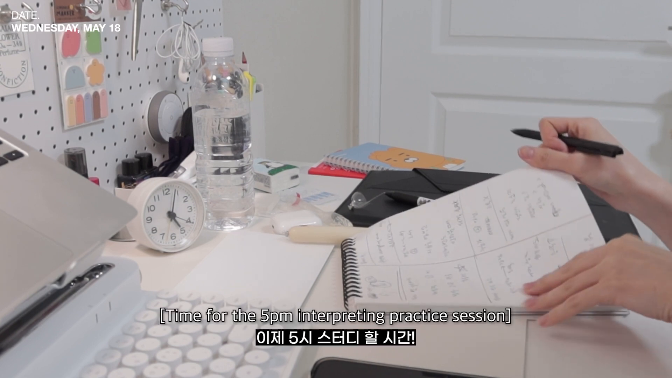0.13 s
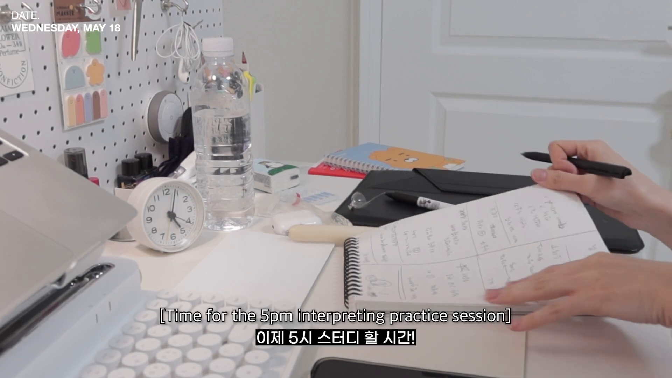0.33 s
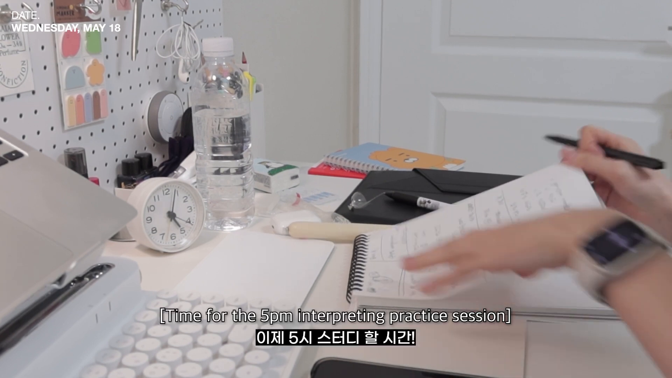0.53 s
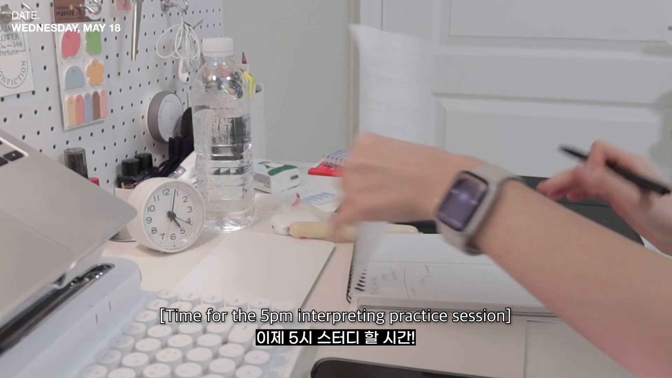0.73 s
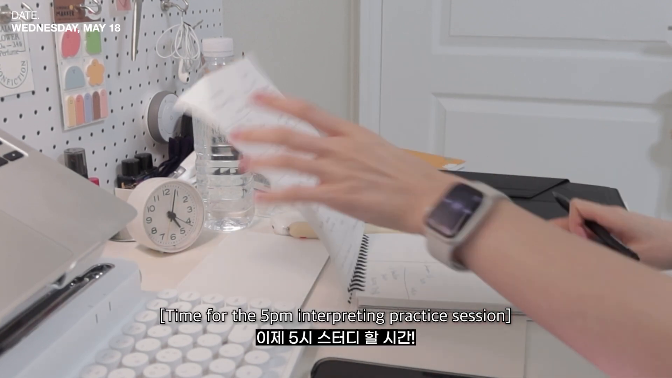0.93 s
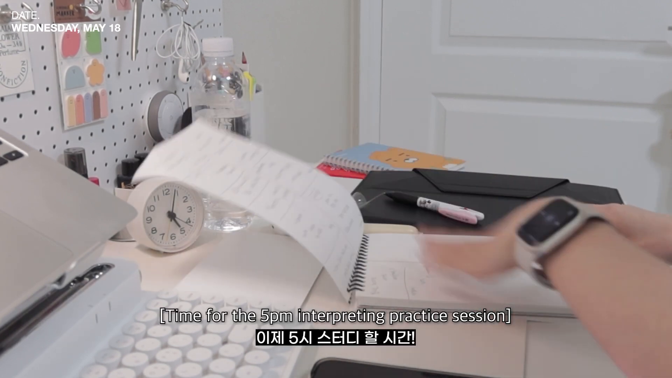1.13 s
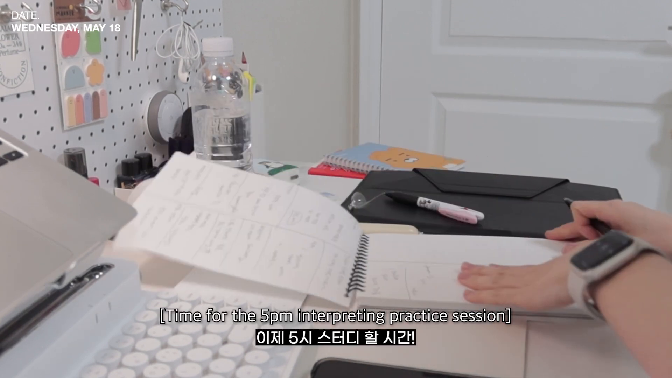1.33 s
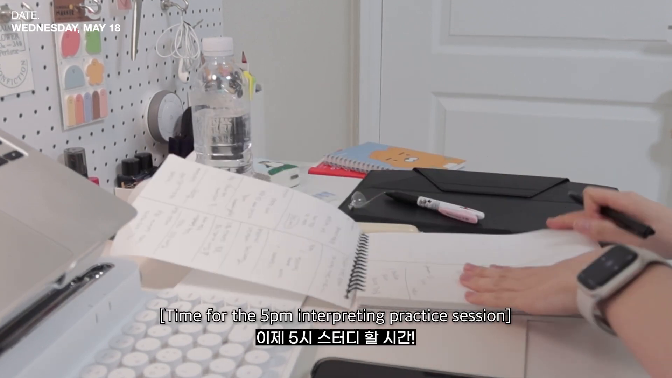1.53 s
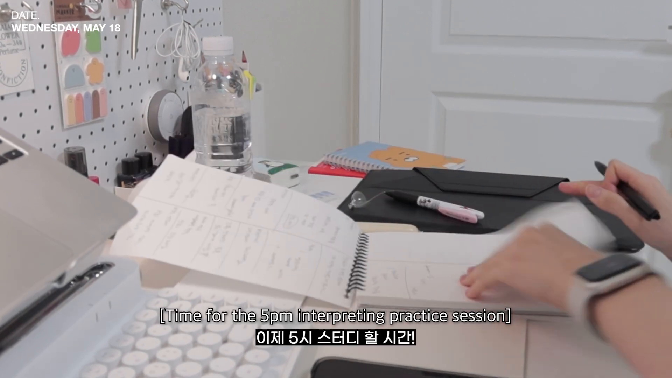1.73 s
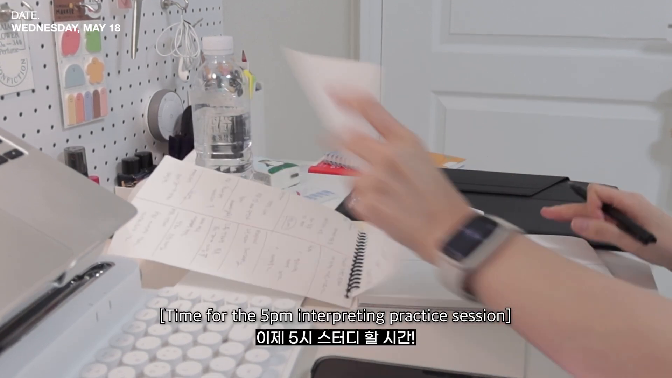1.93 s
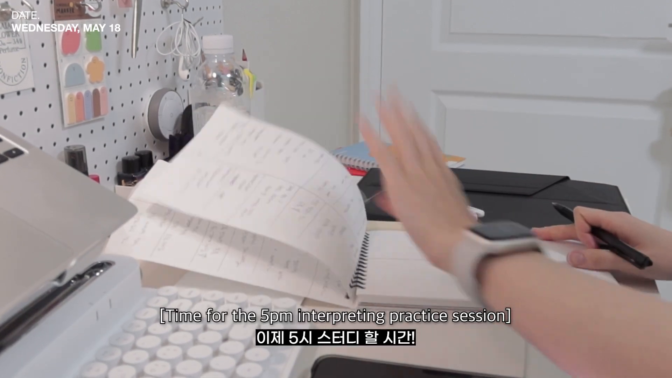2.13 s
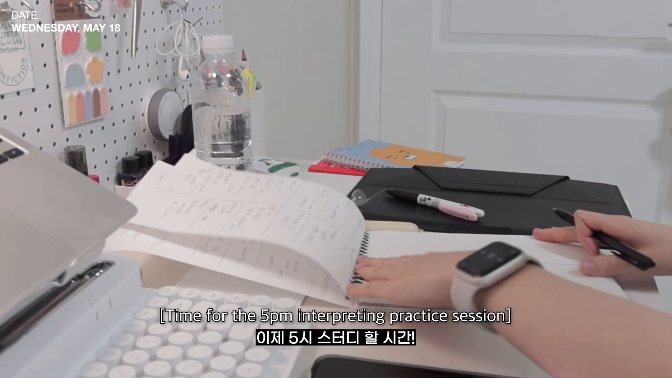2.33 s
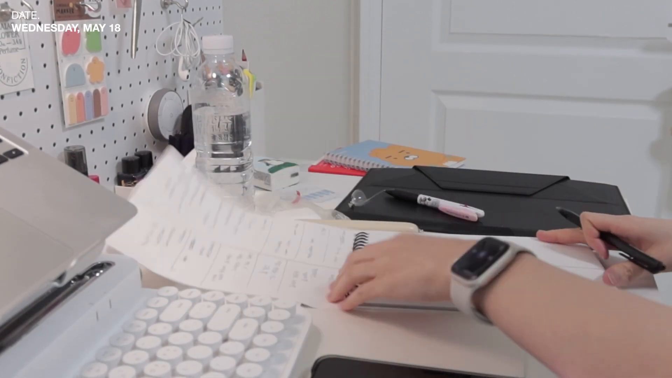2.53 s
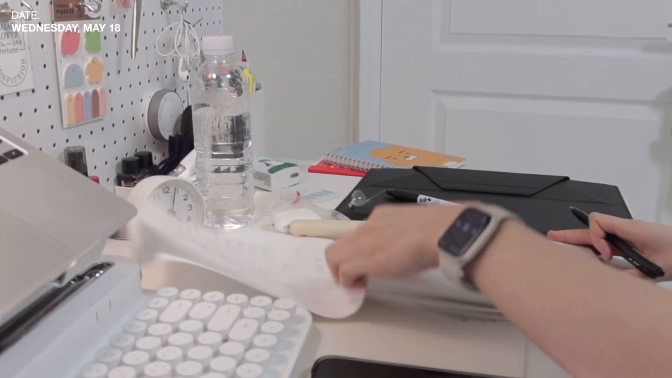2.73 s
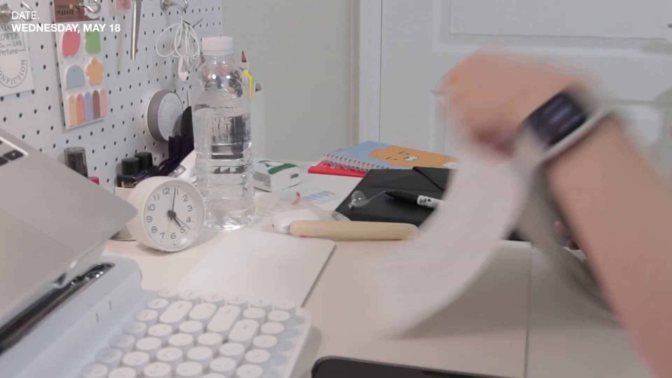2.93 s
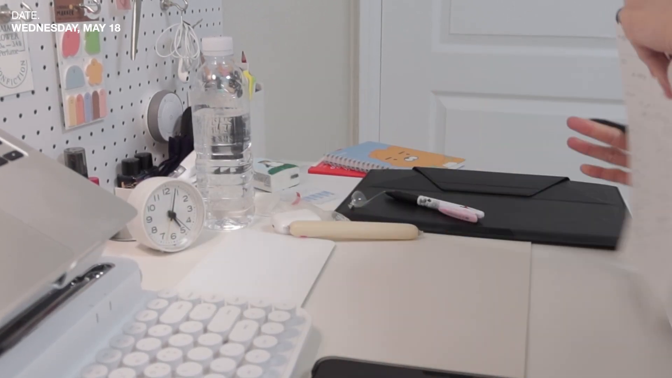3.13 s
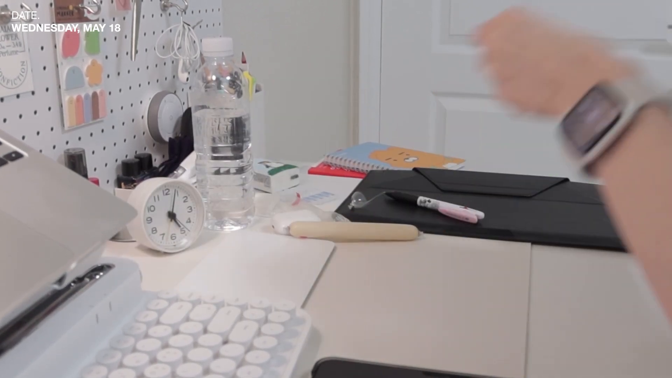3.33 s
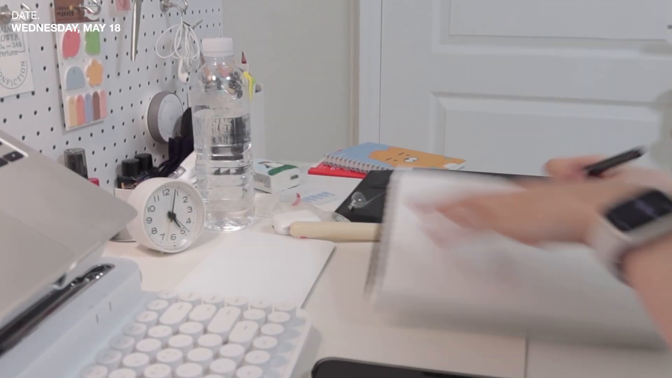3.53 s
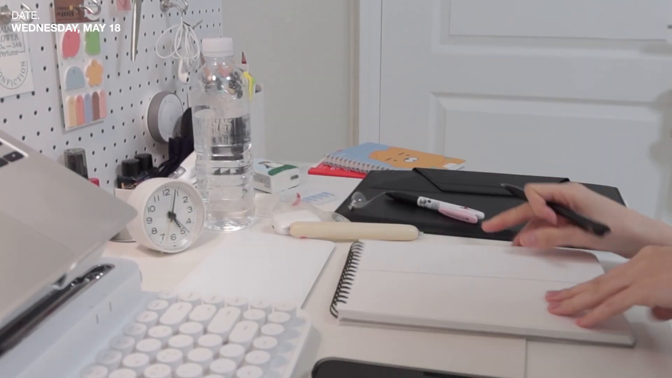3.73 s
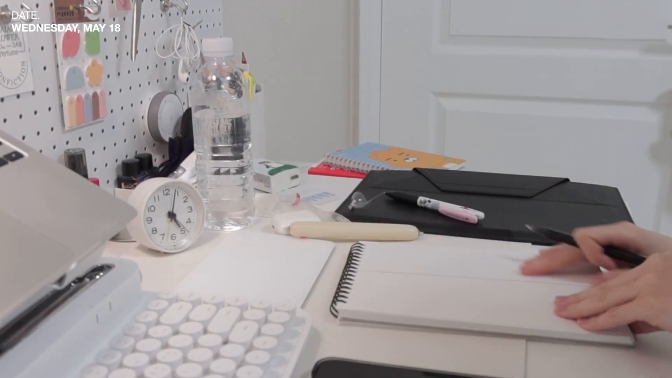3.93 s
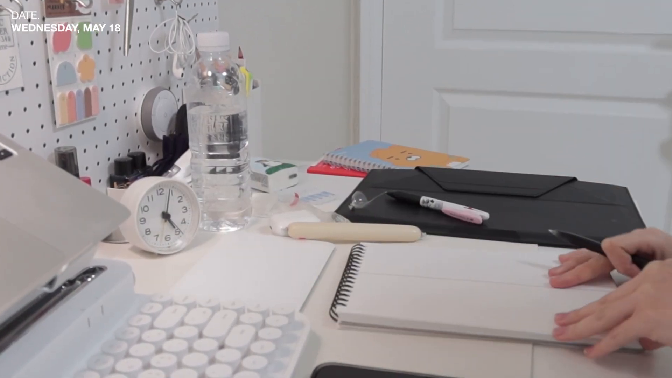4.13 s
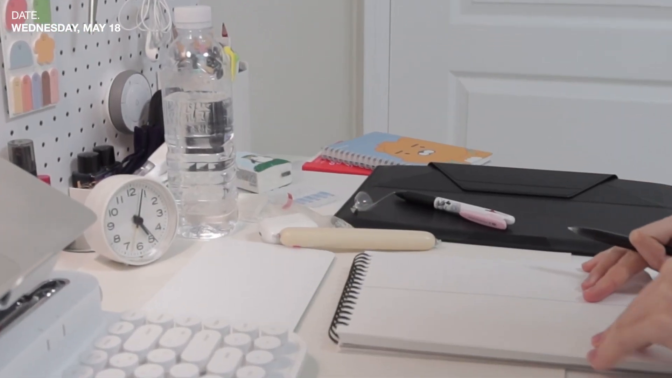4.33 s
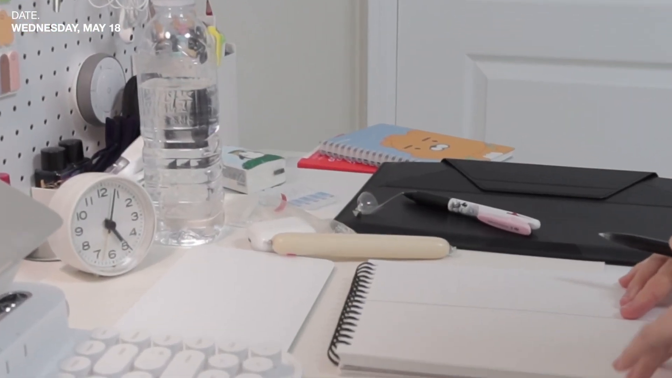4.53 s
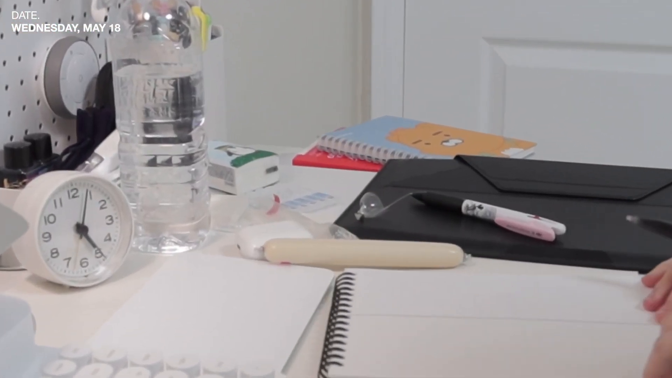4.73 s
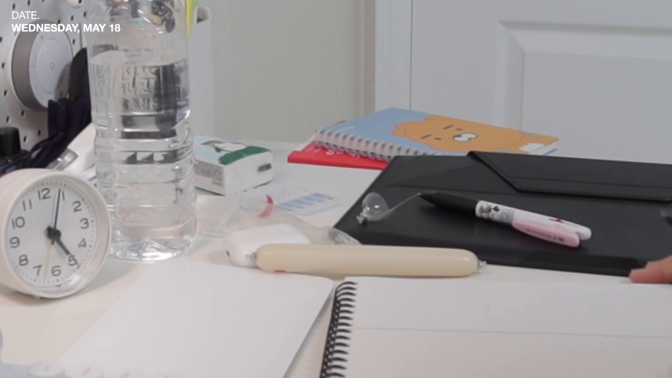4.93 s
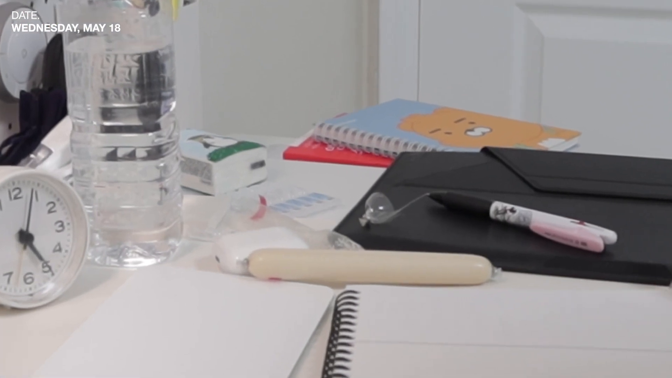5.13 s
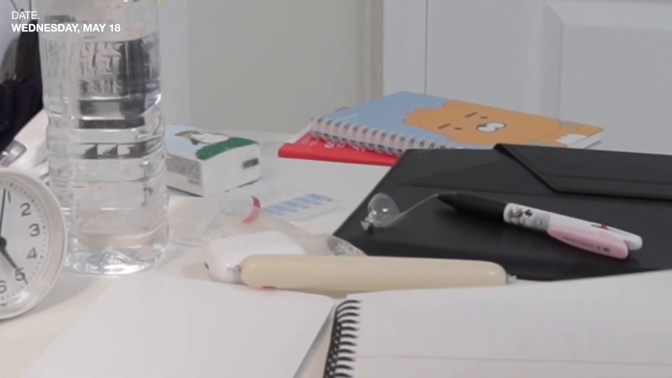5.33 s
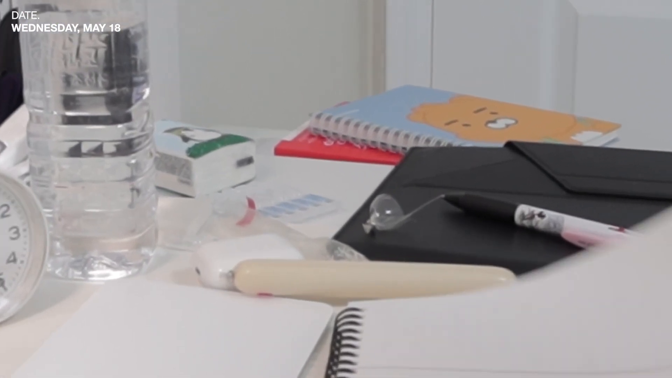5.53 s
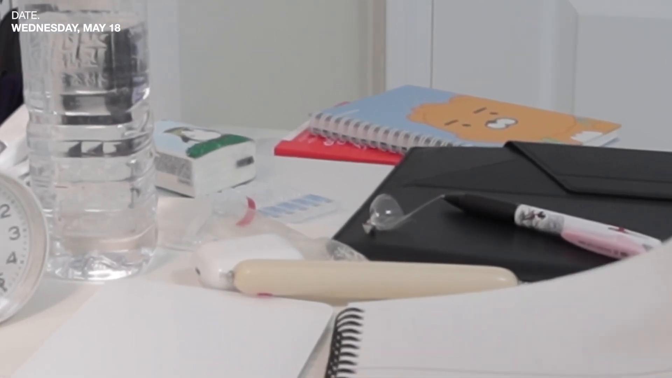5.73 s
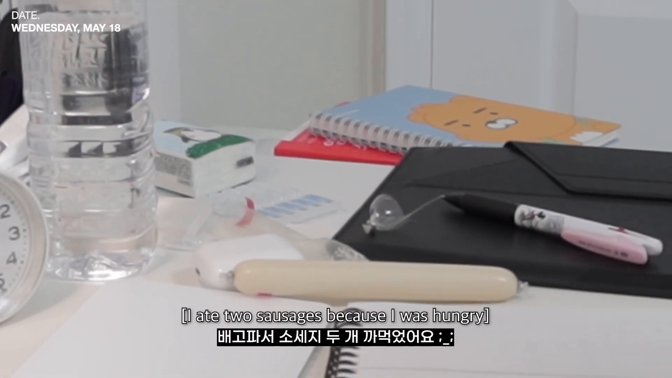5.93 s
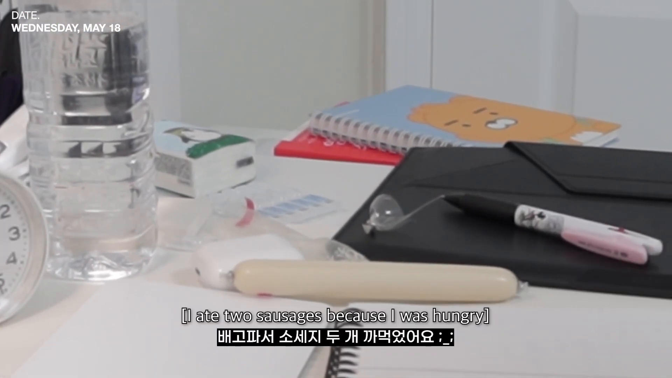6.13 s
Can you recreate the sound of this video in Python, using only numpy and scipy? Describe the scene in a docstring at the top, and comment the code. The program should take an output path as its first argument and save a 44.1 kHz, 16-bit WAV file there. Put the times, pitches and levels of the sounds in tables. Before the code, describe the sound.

Close to a small microphone in a small quiet room, hands slide over paper and turn notebook pages with rustles, flaps and dry snaps. One snap is loud enough to distort. More crackly turning follows, then the book drops on the desk with a dull knock. Afterwards there are only small brushes, ticks and faint hum.

```python
"""A faint mains hum and even room noise lie under hands and sheets that already slide at the start.
Pages of a spiral notebook are turned at a desk, close to a small microphone: patchy noise hisses, rustles and flaps.
The paper buckles with dry snaps, each a short noise burst; the loudest snap overloads the input.
Book and hands thud on the desk top as damped modes ring, and the book is dropped once.
Walls answer with decaying noise tails."""
import sys
import numpy as np
from scipy import signal
from scipy.fft import rfft, irfft, next_fast_len
from scipy.io import wavfile
from scipy.ndimage import uniform_filter1d, map_coordinates

SR = 44100
rng = np.random.default_rng(int(sys.argv[2]) if len(sys.argv) > 2 else 0)


def wrap_up_sound(samples):
    """Save the sound to the file named by the first command line argument, as 16-bit audio."""
    columns = np.atleast_2d(samples).T
    # keep every value between -1 and 1, then stretch to whole-number steps
    tamed = np.clip(columns, -1, 1)
    steps = np.round(tamed * 32767).astype(np.int16)
    wavfile.write(sys.argv[1], SR, steps)


N = 277429  # length [samples]


def amp(db):
    """Gain of a level in dB."""
    return 10 ** (np.asarray(db) / 20)


def unit(x):
    """Scaled to rms 1."""
    return x / np.sqrt(np.mean(x ** 2) + 1e-20)


def along(points, hz):
    """Curve through (Hz, value) points on a log frequency axis."""
    f, value = np.transpose(points)
    return np.interp(np.log(hz + 1), np.log(f + 1), value)


def wobble(rate):
    """A smooth random curve, rate knots a second."""
    knots = rng.standard_normal(int(N * rate / SR) + 4)
    return map_coordinates(knots, [np.arange(N) * rate / SR])


def filtered(x, response):
    """x times a response of frequency, padded so that its tail does not wrap round."""
    size = next_fast_len(len(x) + 8192)
    hz = np.fft.rfftfreq(size, 1 / SR)
    return irfft(rfft(x, size) * response(hz), size)[:len(x)]


def rush(spectrum, patchy_db, grain=1):
    """Noise of rms 1, patchy in time and pitch, multiplied by a grain and coloured by a spectrum."""
    noise = signal.stft(rng.standard_normal(N), nperseg=256)[2]
    patches = uniform_filter1d(rng.standard_normal(noise.shape), 6, 0)  # across frequency
    patches = uniform_filter1d(patches, 8, 1)  # across time
    patchy = signal.istft(noise * amp(patchy_db * unit(patches)), nperseg=256)[1][:N]
    return unit(filtered(patchy * grain, lambda hz: amp(along(spectrum, hz))))


# colour of the room noise: (frequency [Hz], relative level [dB per Hz])
AIR_SPECTRUM = [(15, -39), (32, -1.5), (50, 1), (90, 2), (200, -1.5), (420, -5), (520, -1.5), (610, -17),
                (730, -1), (900, -19), (2500, -21), (6000, -28.5), (8000, -21.5), (9500, -23),
                (15700, -23.5)]
HUM_HZ = 119.8


def background():
    """Even room noise and a hum at twice the mains frequency that wavers in phase and level."""
    phase = 2 * np.pi * HUM_HZ * np.arange(N) / SR + 0.57 * wobble(7)
    hum = amp(2.5 * wobble(9)) * np.sin(phase)
    air = amp(0.4 * wobble(3)) * rush(AIR_SPECTRUM, patchy_db=0.6)
    return amp(-52) * hum + amp(-52.5) * air


# strokes of hands and sheets: (time of full strength [s], rise [s], hold [s], sliding hiss level [dB],
# finest treble over the hiss [dB], bending rustle level [dB], flapping level [dB])
PAPER_STROKES = [(0.055, 0.19, 0.065, -37.5, -11.5, -38, -40.5), (0.213, 0.046, 0.051, -39, -8, -43.5, -47),
                 (0.331, 0.045, 0.062, -39, -9.5, -40.5, -42), (0.491, 0.13, .08, -42, -7.5, -48.5, -51),
                 (0.654, 0.11, 0.027, -37.5, -8.5, -39.5, -47), (0.736, 0.045, 0.011, -38.5, -9, -29, -28),
                 (0.798, .03, 0.038, -42, -9, -40.5, -43), (0.863, .02, .01, -45, -10, -40, -37),
                 (0.906, 0.045, 0.017, -42.5, -9, -39, -45), (0.979, 0.083, 0.012, -47, -14, -43, -45.5),
                 (1.044, .03, 0.015, -80, -9, -58, -37.5), (1.29, .03, .01, -51.5, -4, -51, -48),
                 (1.348, 0.017, .01, -47, -8, -37.5, -39.5), (1.416, 0.024, 0.047, -54, -11, -44, -44),
                 (1.596, .02, 0.034, -29, -13.5, -38, -61), (1.723, 0.067, 0.12, -32, -5.5, -38.5, -56.5),
                 (1.834, 0.005, .01, -23, -20.5, -19, -28.5), (1.88, .01, .03, -32.5, -26.5, -35, -39),
                 (1.927, 0.016, .02, -27.5, -2.5, -21.5, -35.5),
                 (2.033, 0.027, 0.093, -34, -15, -32, -35.5), (2.165, .04, 0.016, -54, -20, -24.5, -29),
                 (2.362, 0.033, 0.14, -46.5, -7, -46.5, -45.5),
                 (2.533, 0.027, 0.034, -32.5, -11, -23.5, -32.5),
                 (2.606, 0.052, 0.046, -38.5, -8, -27.5, -30.5), (2.697, 0.033, 0.026, -35.5, -7, -40, -48),
                 (2.746, 0.023, 0.092, -27.5, -7, -33, -40), (2.89, 0.056, 0.09, -28, -7.5, -28, -37),
                 (3.055, 0.035, 0.0099, -27.5, -11.5, -30.5, -53.5),
                 (3.12, .03, 0.0098, -40.5, -6.5, -38.5, -42.5), (3.271, .02, .02, -53.5, -7, -52.5, -45),
                 (3.389, 0.11, 0.0065, -43.5, -2.5, -42, -48.5),
                 (3.547, 0.13, 0.025, -46, -2.5, -51.5, -50.5),
                 (3.659, 0.0097, 0.011, -33, -8, -31.5, -25.5), (3.737, 0.085, 0.13, -43, -7.5, -44.5, -44),
                 (3.974, 0.051, .14, -50, 0.5, -55.5, -53), (4.338, .03, .01, -74, -12, -52, -48.5),
                 (4.43, .03, 0.0091, -69, -13, -55, -61), (4.767, 0.13, 0.12, -52, -6.5, -53.5, -55),
                 (4.992, .07, 0.018, -49, .5, -58.5, -64), (5.297, .03, .03, -52, -5, -57, -56),
                 (5.393, 0.075, 0.12, -37.5, -8.5, -46.5, -51.5), (5.516, .06, 0.057, -36, -10, -43, -48),
                 (5.667, .04, 0.022, -39.5, -12, -42.5, -51), (5.727, .04, .02, -39, -9, -39.5, -50.5),
                 (5.885, 0.15, 0.022, -38, -10.5, -41, -48.5),
                 (5.956, 0.045, 0.092, -42.5, -8.5, -49.5, -58), (6.116, 0.041, 0.054, -43, -4, -48, -64)]
# fall after the hold, one rate each for hiss, finest treble, rustle, flapping: (rate [dB/s])
STROKE_FALLS = [240, 250, 200, 150]
# the same four layers while the hands only lie on the paper: (level [dB])
RESTING_LEVELS = [-60, -68.5, -60, -58]
RISE_POWER = 1.07  # how late in the rise a stroke gathers strength


def strengths():
    """Gain of the four paper layers: strokes rise, hold and fall at each layer's own rate, their powers adding."""
    t = np.arange(N) / SR
    fall = np.array(STROKE_FALLS)[:, None]
    power = amp(np.array(RESTING_LEVELS)[:, None] + 0 * t) ** 2
    for time, rise, hold, slide_db, finest_db, bend_db, flap_db in PAPER_STROKES:
        start = max(round((time - rise) * SR), 0)
        span = slice(start, round((time + hold) * SR) + SR // 2)
        swell = np.clip((t[span] - time) / rise + 1, 0, 1) ** RISE_POWER
        peak_db = np.array([slide_db, slide_db + finest_db, bend_db, flap_db])[:, None]
        since_hold = np.maximum(t[span] - time - hold, 0)
        power[:, span] += (swell * amp(peak_db - fall * since_hold)) ** 2
    return np.sqrt(power)


def crackle(grains, spread_db):
    """Gain that jumps each time a fibre catches, grains a second on average, and falls back within milliseconds."""
    caught = rng.random(N) < grains / SR
    catches = caught * amp(spread_db * rng.exponential(size=N))
    release = amp(-60 * np.arange(300) / SR / 0.0021)  # t60 of 2.1 ms
    return 1 + np.convolve(catches, release)[:N]


# colours of sliding, finest treble, bending and flapping: (frequency [Hz], relative level [dB per Hz])
SLIDE_SPECTRUM = [(1500, -34), (3000, -7), (4200, -2), (5500, -2.5), (7000, -1), (8000, -1), (9300, -14.5),
                  (11000, -50.5)]
FINE_SPECTRUM = [(5290, -23), (9000, -1.5), (9620, -5), (10800, -1), (14500, -10.5), (15600, -18)]
BEND_SPECTRUM = [(500, -19.5), (1100, -5.5), (1700, 1.5), (2500, -2), (3800, -7.5), (6000, -46)]
FLAP_SPECTRUM = [(90, -31), (170, -10), (300, -7.5), (550, -1.5), (850, -2), (1300, -6), (2600, -43)]


def rustle():
    """Sliding hisses high, bending rustles in the middle, the whole sheet flaps low; all share one grip."""
    sliding, finest, bending, flapping = strengths()
    grip = wobble(30)
    fibres = crackle(grains=130, spread_db=2.6)  # shared by all but the flapping
    slide = sliding * rush(SLIDE_SPECTRUM, patchy_db=2.0, grain=fibres ** 0.7)
    fine = finest * rush(FINE_SPECTRUM, patchy_db=2.5, grain=fibres)
    hiss = amp(grip) * (slide + fine)
    bend_gain = bending * amp(0.66 * grip + 1.3 * wobble(60))
    bend = bend_gain * rush(BEND_SPECTRUM, patchy_db=1.5, grain=fibres)
    flap_gain = flapping * amp(0.46 * grip + 1.2 * wobble(45))
    flap = flap_gain * rush(FLAP_SPECTRUM, patchy_db=3.5)
    return hiss, bend + flap


def burst(noise, response, shape):
    """Coloured noise under an envelope, with the envelope's own energy."""
    x = filtered(noise, response) * shape
    return x * np.linalg.norm(shape) / np.linalg.norm(x)


# buckles of the sheet: (time of the peak [s], relative level [dB], pitch of the fold [Hz],
# relative treble level [dB], t60 of the fold [s])
SHEET_SNAPS = [(0.0636, -29.5, 2280, -12, .05), (0.1095, -26.5, 2470, -5, .014),
               (0.209, -27, 1950, -2.5, .05), (0.3294, -21.5, 1730, -18.5, .016),
               (0.3685, -24, 2700, 3.5, .01), (0.4923, -34, 2050, 5.5, .01),
               (0.687, -20.5, 1600, -18, 0.055), (0.7329, -13.5, 2000, -9.5, .016),
               (0.7399, -16.5, 1930, -11, .026), (0.7474, -19, 1870, -16, .025),
               (1.037, -38, 2500, -3, .011), (1.2368, -45, 2300, -14, .014),
               (1.2641, -26.5, 1700, -9, .011), (1.2962, -25, 2310, -2, .01),
               (1.343, -20.5, 2500, -4, .011), (1.3596, -21.5, 1790, 0, .01),
               (1.385, -27.5, 1470, -11, .016), (1.419, -19.5, 2290, -2.5, .014),
               (1.4394, -23, 1760, -7.5, .018), (1.467, -26, 1710, -13.5, .01),
               (1.475, -23, 1420, -13, .01), (1.4877, -33.5, 1820, -12, .01),
               (1.6014, -19, 2780, -14.5, .011), (1.7201, -21, 3820, -7, .01), (1.833, -6, 3430, -15, .011),
               (1.84, -12, 2910, -2, .04), (1.846, -6, 1900, -12, .02), (1.8517, 2, 3000, -7, .015),
               (1.9215, -4.5, 1910, -0.5, .01), (1.9271, -7.5, 1990, -3, .012),
               (1.933, -4.5, 2280, -6.5, .012), (1.9386, -7.5, 2380, 1, .012), (1.9478, -5, 2510, 4, .012),
               (2.0341, -10.5, 3260, -4, .014), (2.0743, -2, 2520, -23, .01), (2.119, -10, 3180, -3.5, .01),
               (2.1457, -8, 1740, -17, .022), (2.152, -7, 1730, -21.5, .01), (2.1798, -16, 1500, -21, .04),
               (2.21, -19.5, 1890, -10, .014), (2.3386, -36.5, 1380, -6, .016),
               (2.3532, -21.5, 2840, -0.5, .011), (2.362, -29.5, 2930, -9, .01),
               (2.374, -20.5, 3160, -4, .01), (2.4242, -16, 3030, -6.5, .01), (2.4524, -15, 2850, -3, .01),
               (2.5015, -21, 3020, -2.5, .01), (2.52, -10.5, 3030, -13.5, .01),
               (2.5294, -13.5, 2690, -12.5, .01), (2.5596, -13, 2090, -12, .025),
               (2.6027, -20.5, 2320, 4, .03), (2.6196, -12, 1100, -8, .037), (2.6436, -18, 1730, -16, .03),
               (2.6565, -14.5, 2120, 0, 0.029), (2.7395, -12.5, 1700, 1, .03),
               (2.8526, -7.5, 3090, -4, .01), (2.859, -8.5, 3370, 0, .01), (2.8936, -18.5, 2540, -2.5, .05),
               (2.93, -16, 3180, 4.5, .01), (2.9628, -17.5, 2530, -5, .041),
               (3.0442, -16, 3850, -13.5, .05), (3.056, -14, 3820, -25, 0.042),
               (3.0707, -16, 3500, -17, 0.024), (3.112, -23, 1900, -11.5, .011),
               (3.1268, -15.5, 1800, -9, .024), (3.3897, -32.5, 2300, -6, .05),
               (3.5196, -24.5, 2460, 2.5, .015), (3.6516, -27, 1000, -1, .013), (3.665, -12, 1400, -8, .01),
               (3.6883, -22, 1610, -15, .026), (3.7848, -29.5, 2250, 7.5, .01),
               (3.8042, -23.5, 2110, -11, .01), (3.8306, -22.5, 1760, -2, .02),
               (4.1412, -34, 1890, -12.5, .015), (4.1565, -33.5, 3840, -25, .01),
               (4.3415, -32.5, 2490, -33, .03), (4.355, -37, 3440, -36, 0.048),
               (4.4446, -40, 2640, -26, .03), (4.844, -26.5, 1900, -1, .01),
               (4.8657, -30.5, 2210, -20, .01), (4.883, -37, 2120, -23, .03), (5.0469, -42, 1970, -6, .013),
               (5.255, -34, 1180, -22, .013), (5.608, -34, 2150, -13, .021), (5.7139, -32, 3110, 0, .01),
               (5.74, -23, 2810, -9, 0.014), (5.8498, -33, 2300, -15, .014),
               (5.8624, -26.5, 850, -14, 0.0144), (5.8844, -21, 1400, -4.5, .025),
               (5.9957, -31.5, 1700, -7, .016)]
# colour of the treble crack: (frequency [Hz], relative level [dB per Hz])
CRACK_SPECTRUM = [(3000, -18.5), (5500, 4), (7500, 13.5), (9300, -3.5), (11000, -1.5), (15700, -13)]
FOLD_WIDTH = 2.63  # width of the fold's band over its pitch, at a treble of 0 dB
NARROWING = 0.32  # dB the band narrows for each dB of treble lost
RISE_SHARE = 0.11  # a snap's rise over its t60


def snaps():
    """Each buckle is a burst of noise: a band at the fold's pitch and a shorter treble crack."""
    out, t = np.zeros(N + SR), np.arange(SR // 12) / SR
    noise = rng.standard_normal((len(SHEET_SNAPS), 2, len(t)))
    for (time, db, pitch, treble_db, t60), (fold_noise, crack_noise) in zip(SHEET_SNAPS, noise):
        rise = RISE_SHARE * t60
        width = FOLD_WIDTH * amp(NARROWING * treble_db)
        attack = np.sin(np.pi / 2 * np.minimum(t / rise, 1)) ** 2
        fall_db = -60 * np.maximum(t - rise, 0) / t60

        def fold_band(hz):
            detuning = hz / pitch - pitch / (hz + 1)
            return 1 / (1 + (detuning / width) ** 2) ** 1.83

        fold = burst(fold_noise, fold_band, attack * amp(fall_db))
        crack_shape = attack * amp(treble_db - 3.0 + 1.4 * fall_db)
        crack = burst(crack_noise, lambda hz: amp(along(CRACK_SPECTRUM, hz)), crack_shape)
        out[round((time - rise) * SR):][:len(t)] += amp(db - 4.0) * (fold + crack)
    return out[:N]


def ring(modes, t, scatter):
    """Damped modes, each struck a little differently."""
    total = 0
    for (hz, db, t60), d in zip(modes, scatter):
        total = total + amp(db + 2 * d - 60 * t / t60) * np.sin(2 * np.pi * hz * t)
    return total


# book and hands against the desk top: (time [s], relative level [dB], relative knock level [dB],
# relative rocking level [dB])
DESK_THUDS = [(0.298, -41.5, -22, -8), (0.731, -31, 7, -35), (1.287, -43, -12, -22), (1.845, -38, 8, -30),
              (2.34, -33, -15, -26), (2.375, -34, -7.5, -28), (2.62, -41.5, 12.5, -22),
              (3.65, -45, -9, -11), (3.662, -14, 0, -21), (3.689, -22, -5, -13), (3.748, -24.5, -21, -26),
              (3.796, -39, 1, -20), (3.828, -31, 6.5, -11), (3.859, -41, 1, -2), (3.887, -29.5, -5.5, -12),
              (3.959, -40.5, -4, -1), (4.398, -50, 6, -20), (4.68, -40, -12.5, -18.5), (4.842, -45, 3, -15),
              (5.243, -55, 8, -20), (5.878, -38, -4, -23), (6.058, -48.5, 4, -18)]
# modes of the desk top, the desk on its legs and the stack of pages:
# (frequency [Hz], level before scatter [dB], t60 [s]); the pages' upper levels also follow the blow
DESK_TOP_MODES = [(77.7, 0.5, 0.11), (124, -5.5, 0.24), (164, -3.5, 0.17), (196, 0, 0.054)]
DESK_LEGS_MODES = [(49.6, 4, 0.61)]
PAGE_STACK_MODES = [(337, 5, 0.05), (387, -3.5, 0.11), (518, 3, 0.063), (645, -1.5, 0.087),
                    (725, 4.5, 0.062)]
HARD_DB = -3  # table level of a full blow
DULLING = 0.11  # dB an octave that the knock's upper modes lose for each dB under a full blow


def thuds():
    """A soft blow rings the desk top low, rocks the whole desk and knocks the stack of pages."""
    out, t = np.zeros(N + SR), np.arange(SR) / SR
    scatter = rng.standard_normal((len(DESK_THUDS), 3, len(PAGE_STACK_MODES)))
    lowest_hz = PAGE_STACK_MODES[0][0]
    for (time, db, knock_db, rock_db), d in zip(DESK_THUDS, scatter):
        rocking = amp(rock_db) * ring(DESK_LEGS_MODES, t, d[1])
        low = (ring(DESK_TOP_MODES, t, d[0]) + rocking) * (1 - np.exp(-t / 0.007))  # soft onset
        tilt = DULLING * (db - HARD_DB)  # dB an octave
        pages = [(hz, level + tilt * np.log2(hz / lowest_hz), t60) for hz, level, t60 in PAGE_STACK_MODES]
        knock = ring(pages, t, d[2]) * (1 - np.exp(-t / 0.004))
        out[round(time * SR):][:SR] += amp(db + 2.5) * (low + amp(knock_db) * knock)
    return out[:N]


# decay of the room: (frequency [Hz], t60 [s])
WALL_DECAYS = [(200, 0.33), (1500, 0.09), (5000, 0.084), (12000, 0.15)]


def room(x):
    """Walls answer, each frequency dying at its own speed; a new tail every quarter second as the sheets move."""
    out, step = np.zeros(N + SR), SR // 4
    for i in range(0, N, step):
        hz, t, noise = signal.stft(rng.standard_normal(SR // 3), SR, nperseg=128)
        decay = amp(-60 * t / along(WALL_DECAYS, hz)[:, None])
        tail = signal.istft(noise * decay, SR, nperseg=128)[1]
        wet = signal.fftconvolve(x[i:i + step], tail / np.linalg.norm(tail))
        out[i + 130:][:len(wet)] += wet  # 130 samples, about 3 ms, of delay
    return out[:N]


def scene():
    """Everything as one microphone hears it; the walls return the snaps and the body of the paper, not its hiss."""
    cracks = snaps()
    hiss, body = rustle()
    near = cracks + hiss + amp(-1.5) * body + thuds()
    echoes = room(amp(-6.0) * cracks + amp(-9) * body)
    return (near + echoes + background())[None]


TOP_HZ = 15750  # band limit


def record(dry):
    """The input saturates towards full scale, then everything from the band limit up is removed."""
    clipped = dry[0] / (1 + np.abs(dry[0]) ** 8) ** (1 / 8)
    return filtered(clipped, lambda hz: hz < TOP_HZ)[None]


dry = scene()
out = record(dry)
wrap_up_sound(out)
```